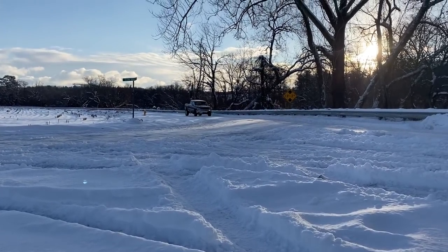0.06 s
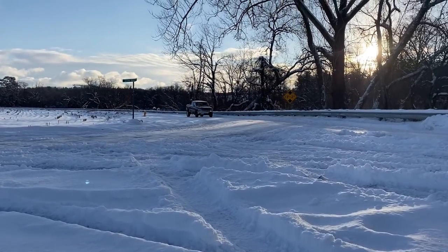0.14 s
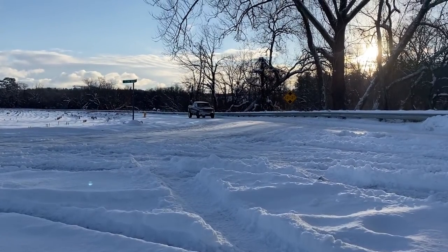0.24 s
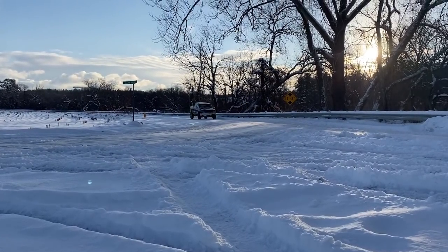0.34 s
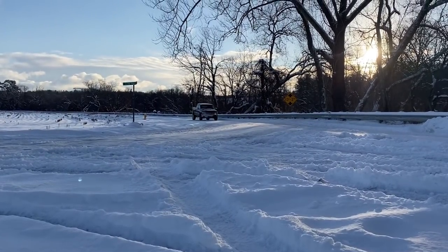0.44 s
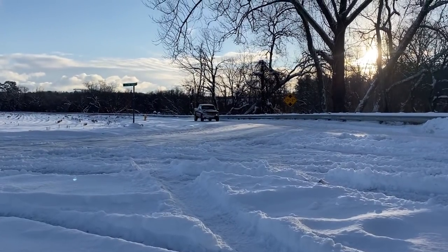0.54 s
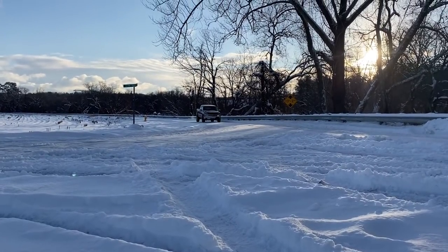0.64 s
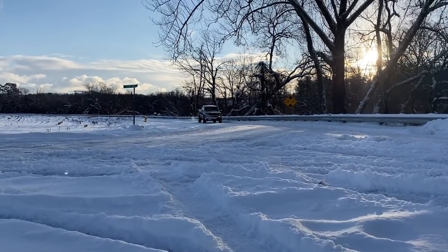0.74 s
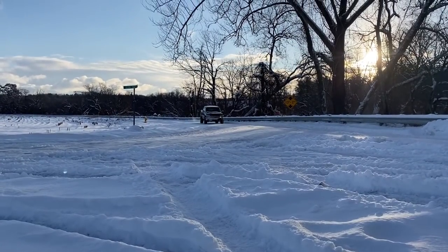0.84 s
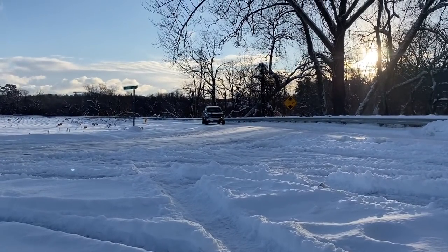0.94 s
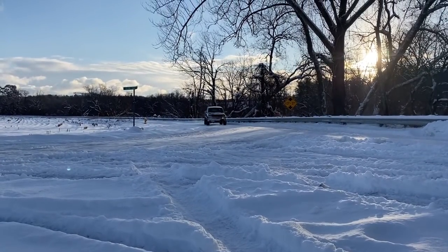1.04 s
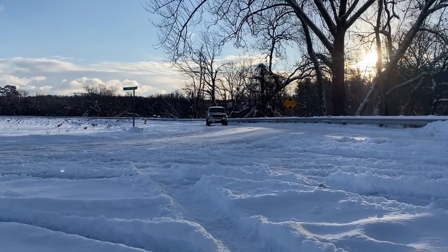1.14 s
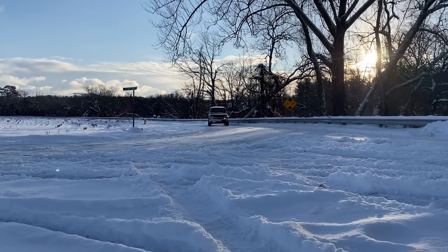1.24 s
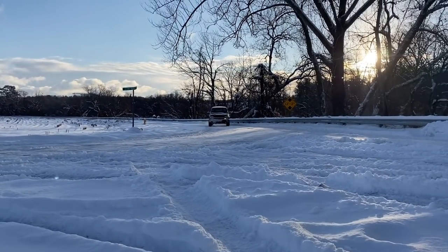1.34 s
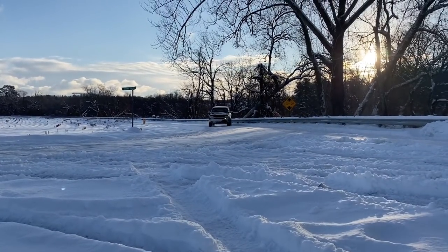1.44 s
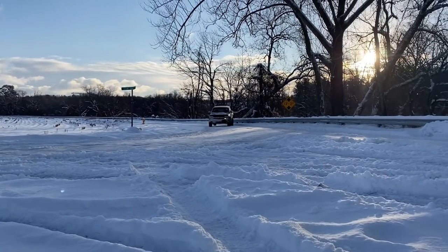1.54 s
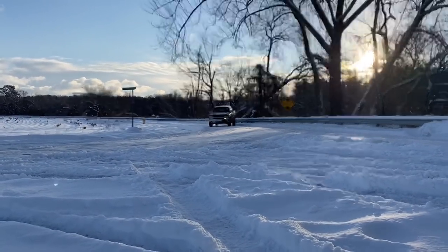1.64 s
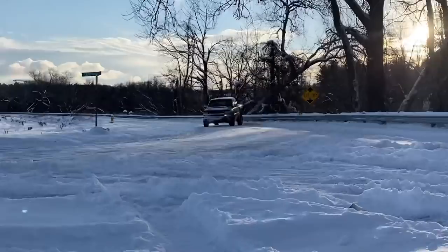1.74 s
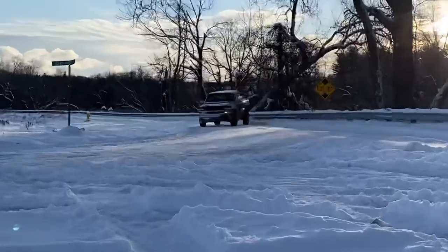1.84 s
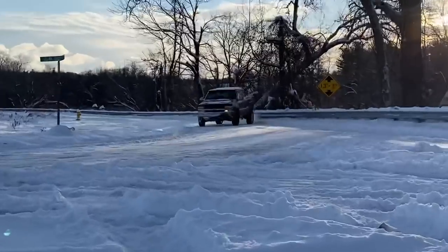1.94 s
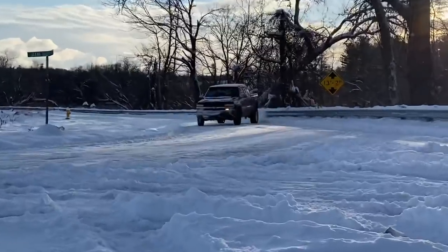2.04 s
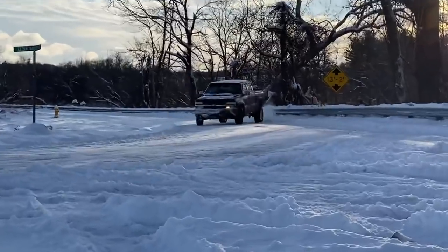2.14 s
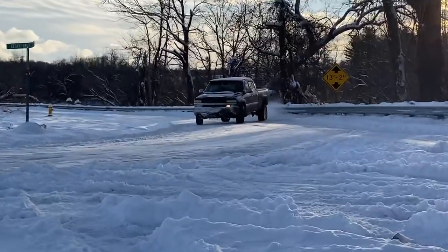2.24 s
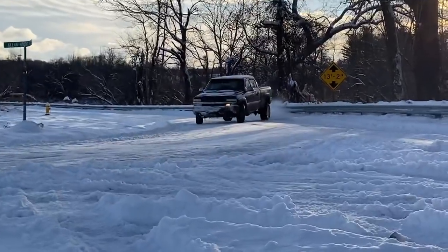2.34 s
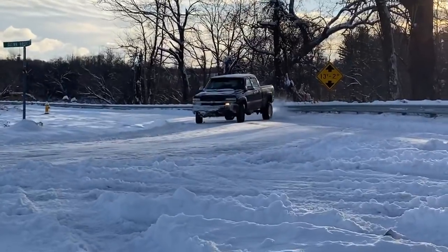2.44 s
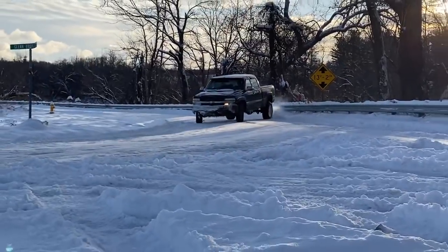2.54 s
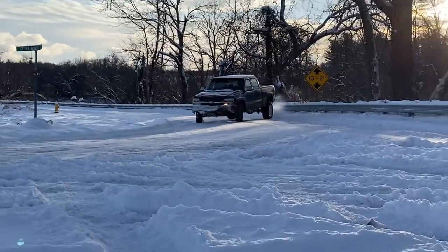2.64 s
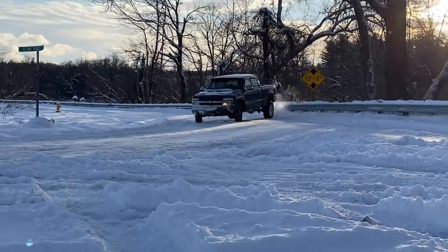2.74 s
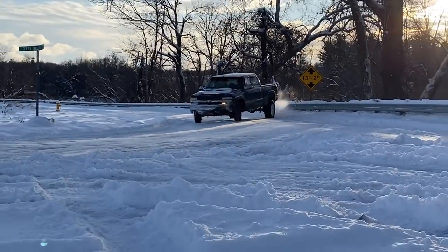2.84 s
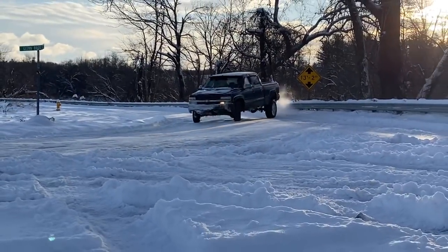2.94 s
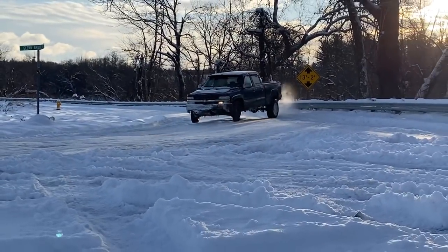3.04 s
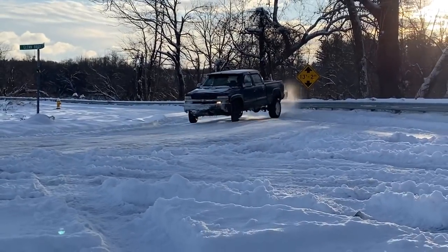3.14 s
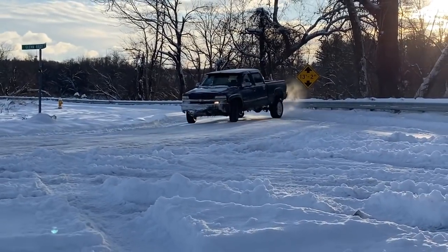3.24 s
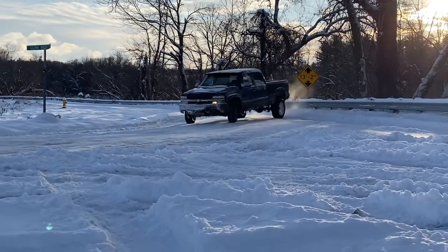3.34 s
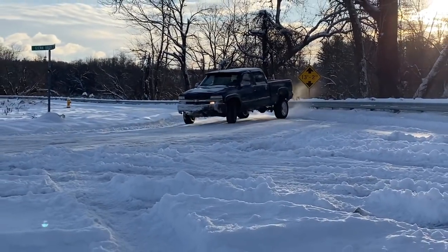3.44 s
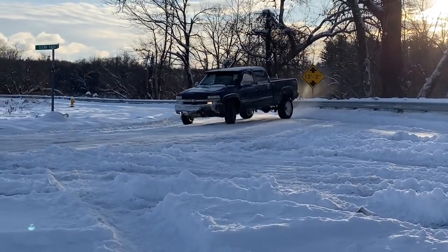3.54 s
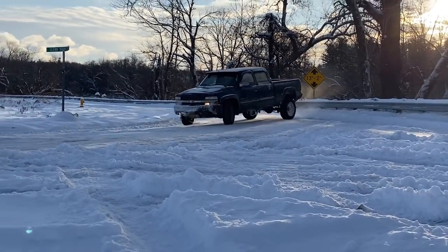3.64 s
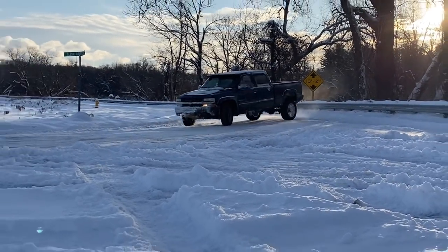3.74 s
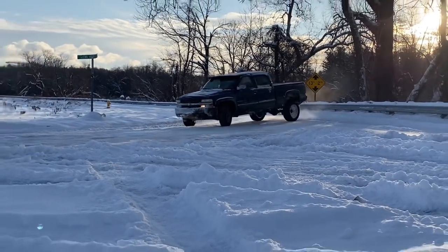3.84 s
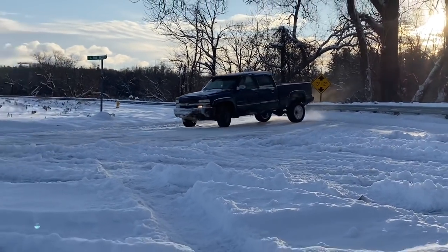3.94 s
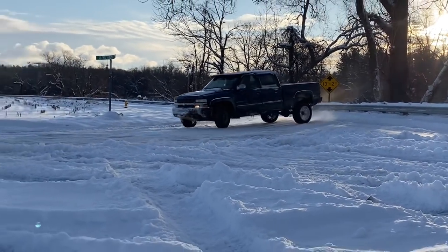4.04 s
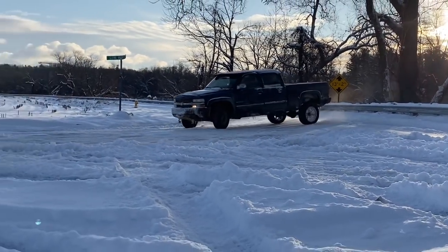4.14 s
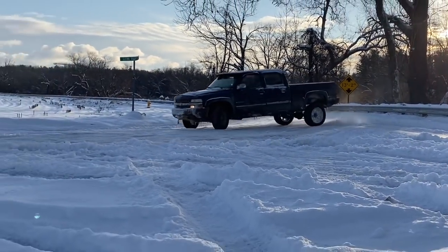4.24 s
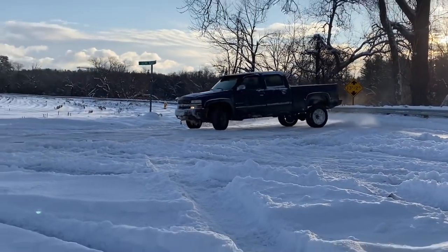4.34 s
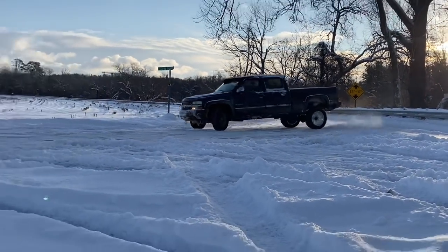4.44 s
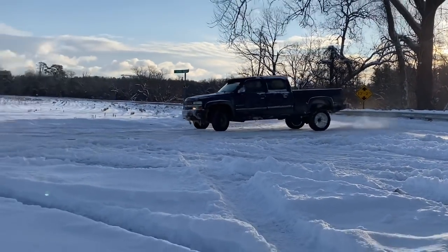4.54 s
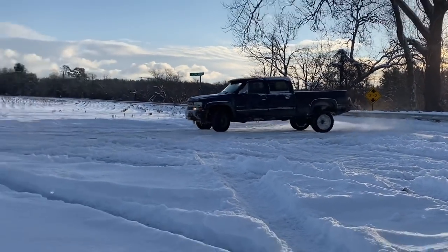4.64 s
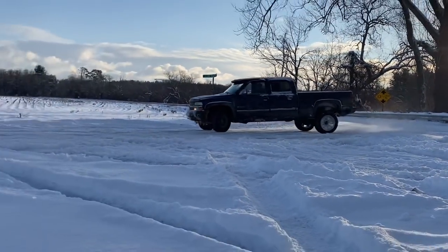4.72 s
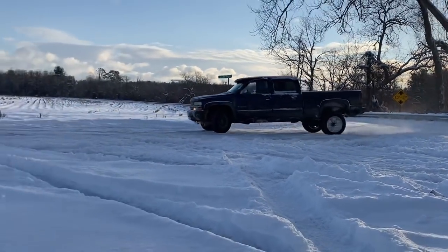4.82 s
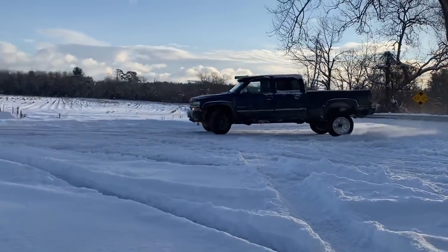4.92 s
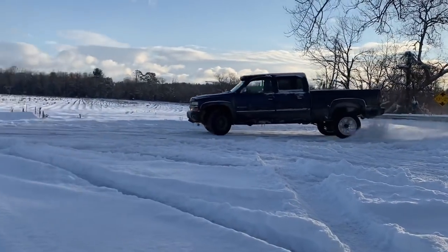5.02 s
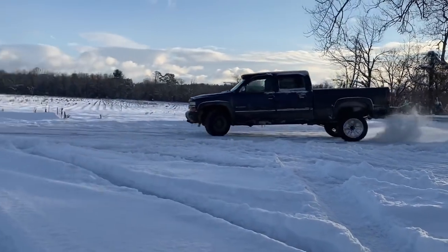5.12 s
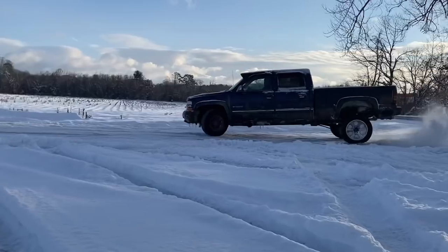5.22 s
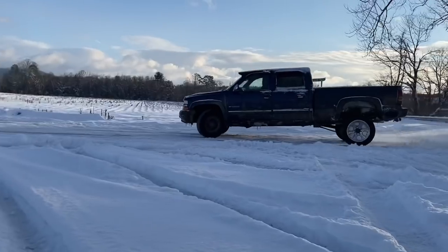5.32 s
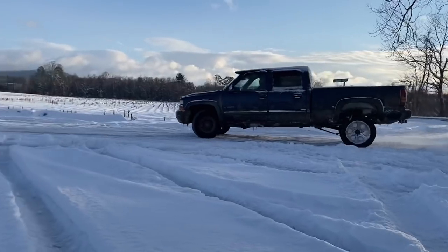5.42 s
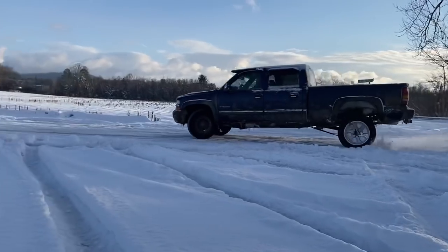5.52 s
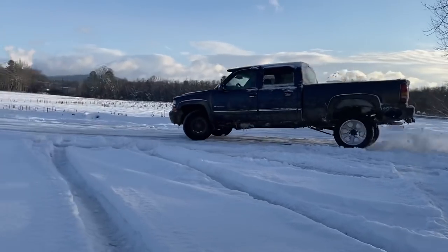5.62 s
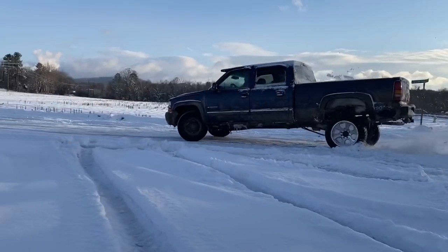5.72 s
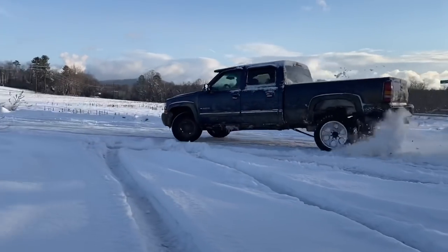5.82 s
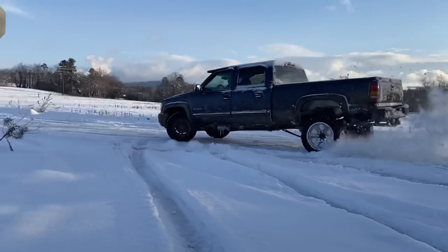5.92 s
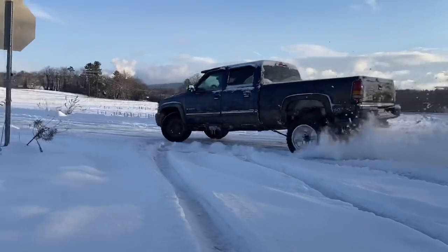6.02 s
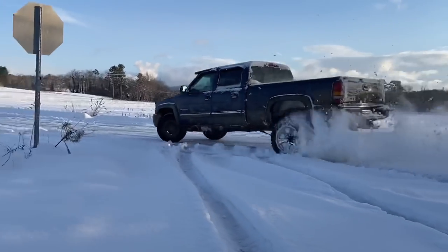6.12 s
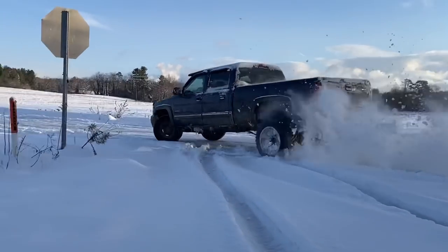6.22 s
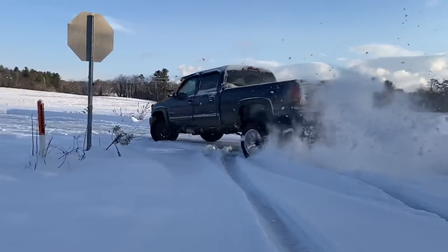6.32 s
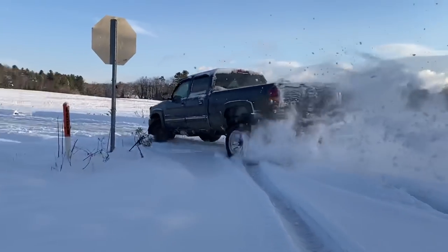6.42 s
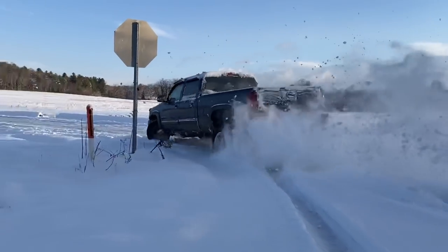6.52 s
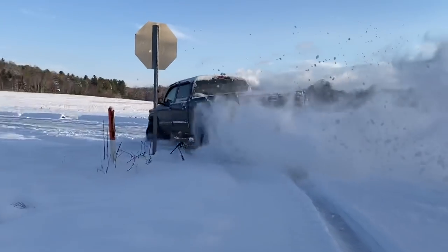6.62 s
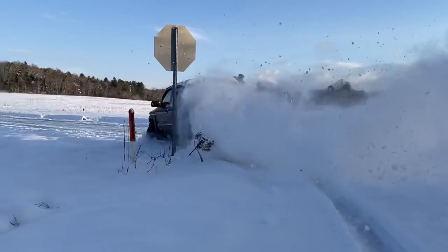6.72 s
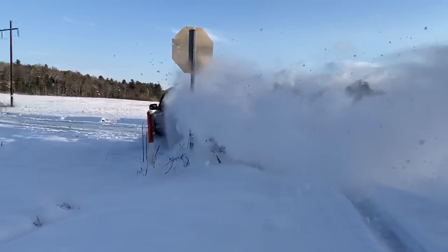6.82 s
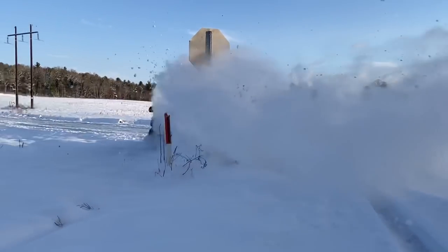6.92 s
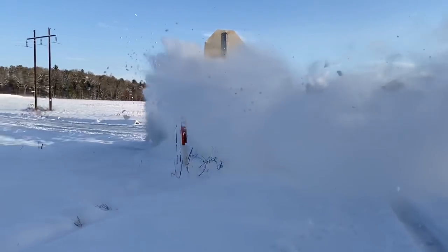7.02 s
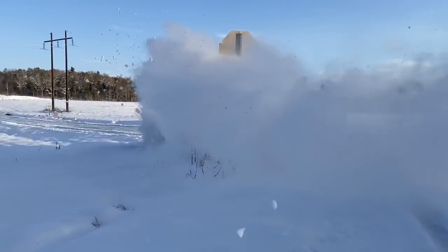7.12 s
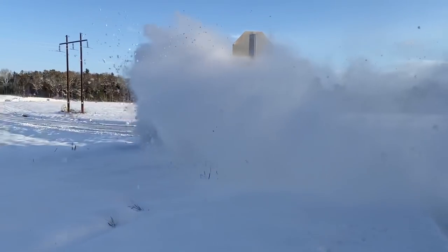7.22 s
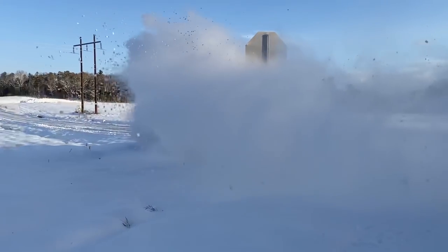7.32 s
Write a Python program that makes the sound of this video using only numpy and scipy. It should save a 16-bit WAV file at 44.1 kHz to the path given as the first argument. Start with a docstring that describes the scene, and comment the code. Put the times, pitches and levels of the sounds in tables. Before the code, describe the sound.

Outdoors in an open snowy field, wind buffets the stereo microphone while a distant V8 pickup approaches with short throttle blips. Bright ticks snap as it nears. From about four seconds it revs in one long pull, booming and droning, tyres churning snow and howling upward with brief yelps. It slides past about thirteen metres away, its exhaust barking in rapid hard cracks amid hissing spray, then eases slightly.

```python
"""A V8 pickup blips its throttle across an open snowy field, then revs to about 5000 rpm in one long pull
and slides past the microphone pair, 13 m away at the nearest, with spinning tyres.
Engine orders sent through pipe resonances boom and drone, pulses and puffs of noise rasp, and at full revs
a hard bark cracks once in every engine cycle. Blurred tones make the tread's howl, grains and hiss the snow.
Filtered noise makes the wind, which buffets the microphone at first, while the truck is far off."""
import sys
import numpy as np
from scipy import signal
from scipy.fft import rfft, irfft
from scipy.io import wavfile
from scipy.ndimage import uniform_filter1d

SR = 44100
rng = np.random.default_rng(int(sys.argv[2]) if len(sys.argv) > 2 else 0)


def bounce(signal):
    """Save signal as a 16-bit WAV file at the path given by the first command-line argument."""
    frames = np.transpose(np.atleast_2d(signal))
    limited = np.clip(frames, -1, 1)
    pcm = np.round(limited * 32767).astype(np.int16)
    wavfile.write(sys.argv[1], SR, pcm)


N = 325149
TIME = np.arange(N) / SR
FREQ = np.fft.rfftfreq(N, 1 / SR)

# engine speed is in four-stroke cycles per second (eight firings each)
IDLE_HZ, RISE_HZ_PER_S, HOLD_S, SAG_HZ_PER_S = 18, 14, .06, 12.5
# the truck comes in at a steady pace, then counts as near
START_M, APPROACH_M_PER_S, NEAR_M = 59.2, 10.37, 13.1
# the pedal is floored, held and eased off
FLOOR_AT, FLOOR_S, EASE_AT, EASE_S = 4.4, 0.8, 6.67, 0.43  # all in seconds
# the once-a-cycle crack takes over from the rasp: start and time constant in s, power share before and after
CRACKS_FROM, CRACKS_GROW_S, CRACKS_BEFORE, CRACKS_AFTER = 5.1, 0.65, .06, 0.9
CRACK_AT = 6.7552  # the moment of one crack (s); the others follow the engine cycle
PULSE_SHARE = .3  # share of the rasp's power that is clean pulses at top speed
EDGE_HZ = 15800  # upper band limit of the sound
BOOM, DRONE, RASPING, SNOW = range(4)  # the layers, in the order of the level columns


def gain_of(db):
    """Decibels to amplitude."""
    return 10 ** (np.asarray(db) / 20)


def evened(x):
    """Scales to rms 1."""
    return x / np.sqrt(np.mean(x ** 2) + 1e-20)


def steadied(x, seconds=0.11):
    """Scales to a running rms of 1, so that a level curve can play it."""
    size = int(seconds * SR)
    power = np.mean(np.atleast_2d(x) ** 2, 0)
    power = uniform_filter1d(uniform_filter1d(power, size), size // 2)
    return x / np.sqrt(abs(power) + 1e-14)


def curve(table, axis=1):
    """One column of a time table, at every sample."""
    table = np.array(table)
    return np.interp(TIME, table[:, 0], table[:, axis])


def read(points, hz):
    """A spectrum, joined on a log-frequency axis."""
    f, value = np.transpose(points)
    return np.interp(np.log(hz + 1), np.log(f + 1), value)


def coloured(x, spectrum):
    """Causal minimum-phase filter with the given spectrum: sharp front, ringing behind."""
    log_gain = np.log(gain_of(read(spectrum, abs(np.fft.fftfreq(4096, 1 / SR)))))
    taps = np.fft.ifft(np.exp(np.conj(signal.hilbert(log_gain)))).real
    return signal.oaconvolve(np.atleast_2d(x), taps[None], axes=1)[:, :N]


def lows(x, hz, steepness):
    """What lies below a cutoff, without delay."""
    return irfft(rfft(x) / (1 + (FREQ / hz) ** steepness), N)


# Left-right likeness of the sound by frequency. Each row: frequency in Hz, likeness (clipped to -1..1).
SAME = [(60, 1), (400, 0.47), (1400, 1.34), (3100, 3), (7000, 2), (9000, -1.7), (11000, 0.9), (13000, -.5)]


def paired(a, b):
    """Two unrelated signals become a left-right pair, alike in the bass and of varying likeness above."""
    same = np.clip(read(SAME, FREQ), -1, 1)
    mid = rfft(a) * np.sqrt((1 + same) / 2)
    side = rfft(b) * np.sqrt((1 - same) / 2)
    return irfft(np.array([mid + side, mid - side]), N)


def noise():
    """White noise with this left-right likeness."""
    return paired(*rng.standard_normal((2, N)))


def drift(rate):
    """Smooth chance of rms 1 that changes about `rate` times a second."""
    points = rng.standard_normal(4096)
    path = np.interp(TIME * rate, np.arange(len(points)), points)
    return evened(uniform_filter1d(path, int(SR / rate / 2) + 1))


def strikes(times, sizes):
    """A train of single clicks."""
    train = np.zeros(N)
    places = np.round(np.asarray(times) * SR).astype(int)
    np.add.at(train, np.clip(places, 0, N - 1), sizes)
    return train


def dying(train, seconds):
    """Each click starts an exponential decay."""
    return signal.lfilter([1], [1, -np.exp(-1 / (seconds * SR))], train)


def dispersed(x, hz=750, width_hz=800):
    """All-pass: delays the parts of a pulse near its centre frequency and below more than the highs."""
    r = np.exp(-np.pi * width_hz / SR)
    poles = np.array([1, -2 * r * np.cos(2 * np.pi * hz / SR), r * r])
    return signal.lfilter(poles[::-1], poles, x)


def ramp(start, seconds):
    """Rises evenly from 0 to 1."""
    return np.clip((TIME - start) / seconds, 0, 1)


def held(start, end, attack_s, release_s):
    """Attack, hold and exponential release."""
    return ramp(start, attack_s) * np.exp(-np.maximum(TIME - end, 0) / release_s)


def distance():
    """Metres from the microphones to the approaching truck, held at its nearest."""
    return np.maximum(START_M - APPROACH_M_PER_S * TIME, NEAR_M)


# Throttle blips on the way in. Each row: opens in seconds, shuts in seconds, top speed in cycles per second,
# then relative levels of boom, drone, rasp and snow spray in dB.
BLIPS = [(-0.03, 0.23, 21, -28, -31, -40.5, -46), (0.478, 0.7, 20, -36, -33, -45, -52.5),
         (1.016, 1.351, 20.3, -43, -31, -37, -50.5), (1.635, 1.89, 27.6, -29.5, -29, -31.5, -49.5),
         (1.874, 2.054, 25, -50, -29, -27.5, -50), (2.087, 2.321, 24.2, -18, -22, -35, -47.5),
         (2.717, 2.996, 21.6, -14, -22.5, -29, -50.5), (3.204, 3.62, 25, -14, -18, -23, -40.5)]
# The long pull past the microphones. Each row: time in seconds, engine speed in cycles per second.
PULL_SPEED = [(4.21, 18.0), (4.4, 21.2), (4.68, 25.0), (4.9, 27.3), (5.05, 28), (5.4, 32.5), (5.7, 36.79),
              (5.9, 37.81), (6.1, 39.29), (6.35, 42.37), (6.5, 42.78), (6.7, 41.67), (7.05, 41.74),
              (7.25, 40.83), (7.37, 42.2)]


def engine_speed():
    """Cycles per second: each blip winds the engine up, holds and lets it sag, until the long pull takes over."""
    speed = np.full(N, float(IDLE_HZ))
    for _, shuts, top_hz, *_ in BLIPS:
        below_rising = RISE_HZ_PER_S * np.maximum(shuts - HOLD_S - TIME, 0)
        below_sagging = SAG_HZ_PER_S * np.maximum(TIME - shuts, 0)
        speed = np.maximum(speed, top_hz - below_rising - below_sagging)
    return np.where(TIME < PULL_SPEED[0][0], speed, curve(PULL_SPEED))


def crank(waver=0.00299):
    """Engine cycles turned, counted from one crack; the speed wavers slightly until the cracks set in."""
    wavering = 1 + waver * drift(25) * (TIME < CRACKS_FROM)
    turns = np.cumsum(engine_speed() * wavering) / SR
    return turns - np.interp(CRACK_AT, TIME, turns)


def firings(turns, count):
    """Times and running numbers of `count` evenly spaced events in each cycle."""
    number = np.arange(np.ceil(turns[0] * count), turns[-1] * count)
    return np.interp(number / count, turns, TIME), number.astype(int)


def load():
    """0 at part throttle, 1 flat out."""
    return ramp(FLOOR_AT, FLOOR_S) - ramp(EASE_AT, EASE_S)


def throttle(attack_s=0.074, release_s=0.056, blip=0.49):
    """How far the throttle is open: each blip, then the long pull."""
    blips = sum(held(opens, shuts, attack_s, release_s) for opens, shuts, *_ in BLIPS)
    return load() + blip * blips


def turbulence(idle=0.22, fade_hz=6, far=0.99):
    """Power share of the exhaust that is noise: most at low revs and from afar."""
    slow = idle * np.exp((IDLE_HZ - engine_speed()) / fade_hz)
    return np.clip(slow + far * (distance() / START_M) ** 4, 0, 1)


def crack_share():
    """Share of the rasp's power that lies in the once-a-cycle crack."""
    grown = 1 - np.exp(-np.maximum(TIME - CRACKS_FROM, 0) / CRACKS_GROW_S)
    return np.clip(CRACKS_BEFORE + (CRACKS_AFTER - CRACKS_BEFORE) * grown, 0, 1)


# How boom, drone, rasp and snow spray answer, one row each: relative coasting level when near in dB,
# loss per doubling of distance in dB, attack in seconds, release in seconds.
RESPONSE = [(-12.5, 12.3, 0.16, 0.25), (-21.5, 9.2, 0.084, 0.16), (-27.5, 6.86, 0.23, 0.091),
            (-44, 7.9, 0.17, 0.078)]
# Loudness of the long pull. Each row: time in seconds, relative levels of boom, drone, rasp and spray in dB.
PULL_DB = [(4.25, -9.5, -27, -30.5, -44.5), (4.3, -19, -16.5, -27, -46), (4.58, -11.5, -16, -19.5, -35),
           (4.88, -13, -12.5, -23, -37), (5.24, -8.5, -16.5, -21, -32.5), (5.83, -8, -15.5, -18.5, -34.5),
           (6.43, -14.5, -23.5, -17, -35.5), (6.67, -23.5, -24.5, -19, -41.5), (6.81, -34, -26, -19, -38),
           (7.06, -33, -32, -23, -36), (7.13, -25.5, -31.5, -24.5, -47), (7.35, -40, -31, -26.5, -39.5)]


def loudness(layer, handover_s=0.032):
    """Gain of one layer: coasting grows as the truck nears, blips add their power, then the long pull."""
    coast_db, doubling_db, attack_s, release_s = RESPONSE[layer]
    power = gain_of(coast_db - doubling_db * np.log2(distance() / NEAR_M)) ** 2
    for opens, shuts, _, *levels_db in BLIPS:
        power = power + (gain_of(levels_db[layer]) * held(opens, shuts, attack_s, release_s)) ** 2
    pulling = ramp(PULL_DB[0][0] - handover_s, handover_s)
    return (1 - pulling) * np.sqrt(power) + pulling * gain_of(curve(PULL_DB, axis=layer + 1))


def field(x, t60=0.43, wet_db=-23):
    """Faint, dull scatter from the snow banks and the trees: sparse random echoes that die away."""
    t = TIME[:SR]
    sparse = rng.standard_normal((2, SR)) * (rng.random((2, SR)) < 2000 / SR)
    taps = uniform_filter1d(sparse * gain_of(-60 * t / t60) * (t > .006), size=6)
    scatter = signal.fftconvolve(x, taps / np.linalg.norm(taps[0]), axes=1)[:, :N]
    return x + gain_of(wet_db) * scatter


# Spectra of wind in the buffets and of low rumble. Each row: frequency in Hz, relative level in dB.
GUST = [(20, -20), (60, 6), (130, 1.5), (300, -0.5), (650, -3.5), (1050, -14), (1600, -36), (4000, -78)]
RUMBLE = [(15, -18), (30, -0.5), (50, 14.5), (70, 20.5), (110, 14), (300, -56)]
# Wind buffets on the microphone. Each row: start in seconds, length in seconds, level in dB,
# reach in the treble in Hz.
BUFFETS = [(0.028, 0.095, -25, 350), (0.212, 0.026, -23, 900), (0.274, 0.049, -23, 745),
           (0.357, 0.053, -24, 550), (0.43, .008, -23, 950), (0.474, .008, -19, 1050),
           (0.564, 0.015, -18.5, 750), (0.597, 0.16, -26, 454), (0.774, 0.023, -20.5, 990),
           (.8, 0.145, -29.5, 252), (0.981, 0.067, -23.5, 800), (1.058, 0.084, -23.5, 300),
           (1.158, 0.038, -18.5, 300), (1.221, 0.039, -21.5, 353)]


def wind(apart=0.4, low_hz=75, rise_s=0.005, fall_s=0.011, rumble_db=-33):
    """Low rumble and abrupt buffets of band-passed noise, each with its own length and brightness."""
    air = coloured(noise() + apart * rng.standard_normal((2, N)), GUST)
    out = gain_of(rumble_db) * steadied(coloured(noise(), RUMBLE))
    for start, length, db, top_hz in BUFFETS:
        band = signal.butter(2, [low_hz, top_hz], "bandpass", fs=SR, output="sos")
        buffet = steadied(signal.sosfilt(band, air), seconds=0.055)
        out += buffet * held(start, start + length, rise_s, fall_s) * gain_of(db)
    return out


# Sharp bright ticks; the last three are the bright edge of exhaust cracks.
# Each row: time in seconds, relative peak in dB.
TICKS = [(2.362, -36), (2.466, -33), (3.647, -26), (3.753, -26), (3.793, -28), (3.848, -27), (3.8876, -34),
         (3.952, -29), (3.988, -33), (4.0506, -25), (4.1, -33), (4.16, -25), (6.3849, -29), (7.0414, -37),
         (7.0658, -33), (7.332, -19.5)]


def ticks(ring_s=0.0024, low_hz=4000, high_hz=11000):
    """Short bright snaps: bursts of band-passed noise with a slightly soft front."""
    times, db = np.transpose(TICKS)
    band = signal.butter(4, [low_hz, high_hz], "bandpass", fs=SR, output="sos")
    snaps = uniform_filter1d(dying(strikes(times, gain_of(db)), ring_s), size=120)
    return evened(signal.sosfilt(band, noise())) * snaps


def churn(lead_s=0.74, dig_s=0.16, dig_db=-20, release_s=0.51, roll_db=-28, roll_release_s=0.2):
    """The tyres rumble through deep snow, hardest as they dig in at the start of the pull."""
    digging = gain_of(dig_db) * held(FLOOR_AT - lead_s, FLOOR_AT + dig_s, lead_s, release_s)
    rolling = gain_of(roll_db) * held(FLOOR_AT, EASE_AT, FLOOR_S, roll_release_s)
    return np.hypot(digging, rolling) * steadied(coloured(noise(), RUMBLE))


# Spectrum of thrown snow close to the microphones. Each row: frequency in Hz, relative level in dB.
SPRAY = [(500, -19), (1500, 1.5), (3200, 7.5), (4300, -0.5), (5600, -3.5), (7300, -4.5), (8500, -4.5),
         (11500, -17.5), (13000, -34), (16000, -48)]


def spray(turns, grains_per_s=1800, spread_db=5.0, grain_share=0.23, surge_db=1.9, chuff=5, eased_chuff=9,
          chuff_s=0.00074, slap_s=.0141, slap=0.36, far_hz=8000, level_db=6.0):
    """Hiss and grains of thrown snow and exhaust gas, duller from afar; each crack adds a double chuff."""
    grains = (rng.random((2, N)) < grains_per_s / SR) * rng.choice([-1, 1], (2, N))
    grain_db = spread_db * np.minimum(rng.exponential(1, (2, N)), 5)
    grains = paired(*(grains * gain_of(grain_db)))
    fizz = np.sqrt(grain_share) * evened(grains) + np.sqrt(1 - grain_share) * noise()
    times, _ = firings(turns, count=1)
    bursts = dying(strikes(times, 0.94) + strikes(times + slap_s, slap), chuff_s)
    # the chuffs are harder as the pedal is eased
    chuffs = 1 + (chuff + eased_chuff * (1 - load())) * crack_share() * bursts
    sound = steadied(coloured(fizz * chuffs * gain_of(surge_db * drift(45)), SPRAY))
    far = lows(sound, far_hz, steepness=10)
    nearness = np.interp(TIME, [0, 3, 5.2], [.05, .2, 1])
    return (far + nearness * (sound - far)) * loudness(SNOW) * gain_of(level_db)


# Howl of the spinning tread. Each row: time in seconds, pitch in Hz, relative level in dB.
TREAD = [(4.2, 330, -35.5), (4.6, 402, -24.5), (5.1, 510, -37), (5.4, 596.3, -28), (5.65, 704, -29),
         (5.85, 775, -28.5), (6.05, 830, -23.5), (6.3, 860, -26), (6.7, 880, -32)]


def tread(blur=110, octave_db=-9, attack_s=0.077, release_s=0.071, level_db=1):
    """Tread blocks scrape packed snow as the wheels spin: a blurred tone and octave rise with wheel speed."""
    angle = 2 * np.pi * np.cumsum(curve(TREAD)) / SR

    def blurred(k):
        wander = drift(k * blur) + 1j * drift(k * blur)
        return (wander * np.exp(1j * k * angle)).real

    howl = blurred(1) + gain_of(octave_db) * blurred(2)
    spinning = held(TREAD[0][0] - attack_s, TREAD[-1][0], attack_s, release_s)
    return spinning * howl * gain_of(curve(TREAD, axis=2) + level_db)


# Brief yelps in the howl. Each row: start in seconds, length in seconds, middle pitch in Hz, level in dB.
YELPS = [(5.272, 0.028, 620, -20), (5.369, 0.038, 600, -18.5), (5.457, 0.016, 630, -14),
         (5.582, .025, 670, -21), (5.69, 0.041, 690, -23), (5.796, 0.016, 700, -18),
         (5.845, 0.02, 780, -9.5), (5.982, 0.011, 790, -13)]


def yelps(droop=.06, rough=0.65, attack_s=.002, release_s=0.0041):
    """The tread's howl flares into short, rough tones that droop in pitch."""
    out = np.zeros(N)
    for start, length, hz, db in YELPS:
        turns = np.cumsum(hz * (1 + droop * (.5 - ramp(start, length)))) / SR
        envelope = held(start, start + length, attack_s, release_s)
        out += gain_of(db) * envelope * np.sin(2 * np.pi * turns)
    return out * (1 + rough * drift(300))


# Spectrum of the crack. Each row: frequency in Hz, relative level in dB.
CRACK = [(40, -32), (130, -8), (300, -1.5), (420, -7.5), (560, 2), (800, 3.5), (1050, 1), (1350, -6.5),
         (1700, -6.5), (2250, -6), (2450, -15.5), (3100, -27), (3400, -22), (4000, -22.5), (4600, -40),
         (5300, -33), (8000, -49), (14000, -52)]


def cracks(turns, erratic_db=2, echo_s=0.00526, echo=0.52, second_s=.0141, second=0.45,
           spit=0.027, spit_s=0.013):
    """One cylinder barks far harder than the rest, erratically at first; duller, weaker slaps follow."""
    times, _ = firings(turns, count=1)
    spread_db = erratic_db * np.interp(times, [5.8, 6.1], [1, 0])
    sizes = gain_of(spread_db * rng.standard_normal(len(times)))
    train = strikes(times, sizes)
    # below top revs two more pulses in each cycle crack as well: a snarl
    snarl = sizes * np.interp(times, [5.75, 6.15], [1, 0])
    for place, size in [(.34, 0.53), (.625, 0.85)]:
        train = train + strikes(times + place * np.gradient(times), size * snarl)
    slaps = strikes(times + echo_s, echo * sizes) + strikes(times + second_s, second * sizes)
    pulses = dispersed(train + uniform_filter1d(slaps, size=14))
    drive = pulses + spit * noise() * dying(train, spit_s)
    return steadied(coloured(drive, CRACK)) * np.sqrt(crack_share()) * loudness(RASPING)


# Blow-downs of the eight cylinders in one cycle: a single list of relative strengths in dB.
CYLINDERS = [-2, -3, -1, -1, -2.5, 1, -9, -15]
# Spectrum of the rasp. Each row: frequency in Hz, relative level in dB.
RASP = [(200, -31.5), (400, 0), (550, 2.5), (800, 3), (1050, -0.5), (1350, -10), (1700, -8.5),
        (2200, -12.5), (2600, -16), (3200, -13), (4200, -19.5), (7000, -22.5), (14000, -59.5)]


def rasp(turns, uneven_db=3, puff_s=0.0081, steady=0.77, round_trip_s=0.00393, reflection=0.036,
         bark_hz=1800, bark=1.0, level_db=-0.96):
    """Every firing sends a pressure pulse and a puff of hiss from the pipe; pulses stand out at high revs."""
    times, number = firings(turns, count=8)
    strength_db = np.array(CYLINDERS)[number % len(CYLINDERS)]
    strength_db = strength_db + uneven_db * rng.standard_normal(len(times))
    train = strikes(times, gain_of(strength_db))
    puffs = steadied(coloured(noise() * (steady + dying(train, puff_s)), RASP))
    pulses = steadied(coloured(dispersed(train), RASP))
    speed = engine_speed()
    share = PULSE_SHARE * (speed / speed.max()) ** 2
    sound = np.sqrt(1 - share) * puffs + np.sqrt(share) * pulses
    # the wave runs back along the pipe and comes out again: hollow peaks
    sound = sound + reflection * np.roll(sound, round(round_trip_s * SR), axis=1)
    # an open throttle steepens the pulses and brightens the bark
    bright = signal.lfilter(*signal.iirpeak(bark_hz, Q=1.6, fs=SR), sound)
    sound = steadied(sound + bark * throttle() * bright)
    return sound * np.sqrt(1 - crack_share()) * loudness(RASPING) * gain_of(level_db)


# Engine orders from uneven firing in the two cylinder banks. Each row: multiple of the cycle rate,
# relative level at part throttle in dB, relative level flat out in dB.
ORDER_DB = [(1, -20, -24), (2, -8, -7), (3, -9.5, 10), (4, -8, -3.5), (5, 0, 2), (6, -13, -3.5),
            (7, -8.5, -17.5), (8, 3, -1.5), (9, -3, -16), (10, -12.5, -10.5), (11, -7.5, -0.5),
            (12, -5, -0.5), (13, 1.5, -9.5), (14, -5.5, 3.5), (15, -6, 2), (16, -7, -4), (17, -2, -12),
            (18, -0.5, -20), (19, -4, -7), (21, 0.5, 7.5), (23, -2, 1), (26, 2.5, 2)]
# Response of the exhaust pipe. Each row: frequency in Hz, relative level in dB.
PIPE = [(25, -34), (55, -10), (82, -3.5), (115, -2.5), (152, -7.5), (195, -3.5), (255, -11.5), (305, -8),
        (345, -15.5), (400, -16), (560, -25.5), (900, -56.5)]


def exhaust(turns, flutter=0.19, split_hz=150, boom_db=-0.03, drone_db=-0.8):
    """Engine orders and turbulence sweep through the pipe's resonances: a low boom and a drone above it."""
    speed, rough, flat_out = engine_speed(), turbulence(), load()
    tone = np.zeros(N)
    for k, part_db, full_db in ORDER_DB:
        order_db = part_db + flat_out * (full_db - part_db)
        size = gain_of(order_db + read(PIPE, k * speed))
        wave = np.cos(2 * np.pi * (k * turns + rng.random()))
        tone += size * (1 + flutter * drift(22)) * wave
    hiss = evened(coloured(noise(), PIPE))
    gas = np.sqrt(1 - rough) * steadied(tone) + np.sqrt(rough) * hiss
    low = lows(gas, split_hz, steepness=12)
    boom = steadied(low) * loudness(BOOM) * gain_of(boom_db)
    drone = steadied(gas - low) * loudness(DRONE) * gain_of(drone_db)
    return boom + drone


# Where the truck is heard. Each row: time in seconds, left minus right in dB.
PAN = [(0, 8), (1.75, 2.5), (2.25, -1), (2.75, 0), (3.3, -2.2), (4.75, 2), (5.75, 2), (6.75, 1.5),
       (7.37, 2.5)]


def scene():
    """The truck in the open field, faint at first, and the wind at the microphone."""
    turns = crank()
    truck = spray(turns) + tread() + yelps() + cracks(turns) + rasp(turns)
    pan_db = curve(PAN) / 2
    truck = truck * gain_of(np.array([pan_db, -pan_db]))
    return wind() + churn() + field(ticks() + truck + exhaust(turns))


# Difference in colour between the channels. Each row: frequency in Hz, left minus right in dB.
TILT = [(60, -2), (130, -2.5), (290, -.5), (640, 0), (1410, 6.5), (3100, 0), (6820, 1), (15000, -3.5)]


def record(dry):
    """Left and right differ in colour; only the highest peaks are rounded off; then the band limit."""
    tilt_db = read(TILT, FREQ) / 2
    x = irfft(rfft(dry) * gain_of(np.array([tilt_db, -tilt_db])), N)
    knee, room = .68, .29  # where rounding starts and the room above it, full scale 1
    rounded = room * np.tanh(np.maximum(abs(x) - knee, 0) / room)
    x = np.clip(x, -knee, knee) + np.sign(x) * rounded
    band_limit = signal.firwin(511, EDGE_HZ, window=("kaiser", 9), fs=SR)
    return signal.oaconvolve(x, band_limit[None], "same")


dry = scene()
out = record(dry)
bounce(out)
```